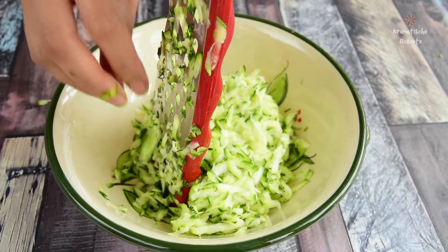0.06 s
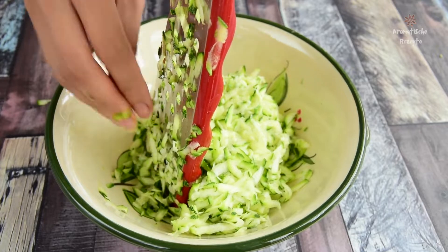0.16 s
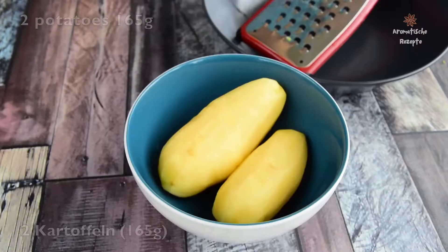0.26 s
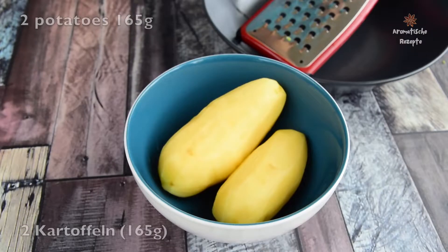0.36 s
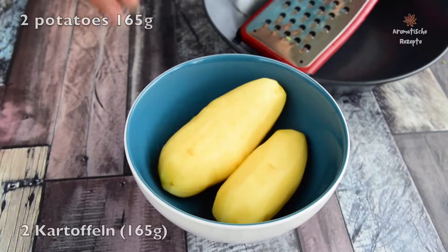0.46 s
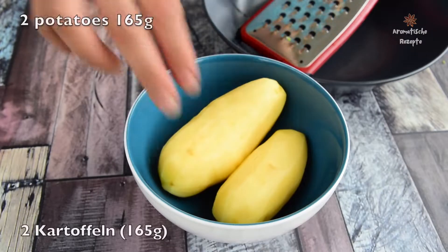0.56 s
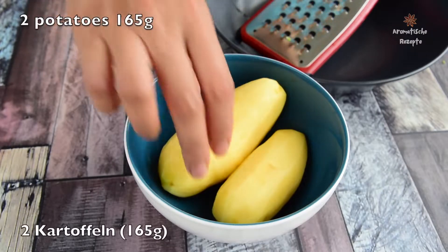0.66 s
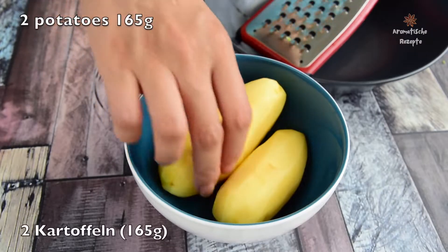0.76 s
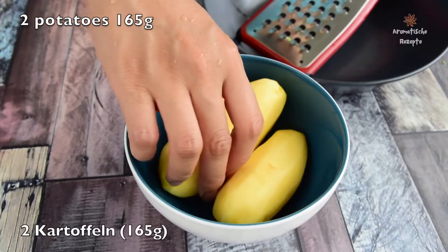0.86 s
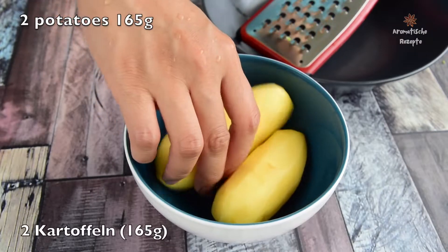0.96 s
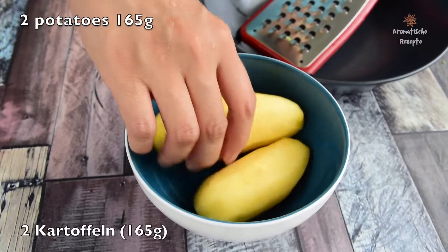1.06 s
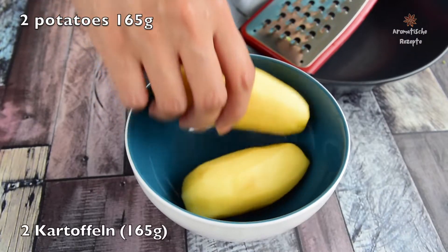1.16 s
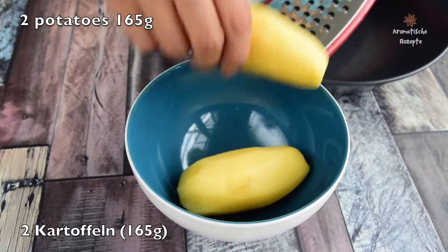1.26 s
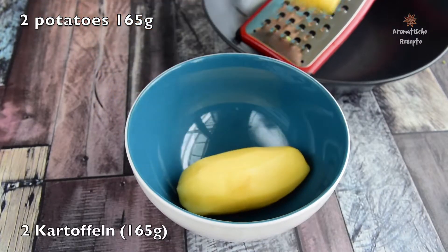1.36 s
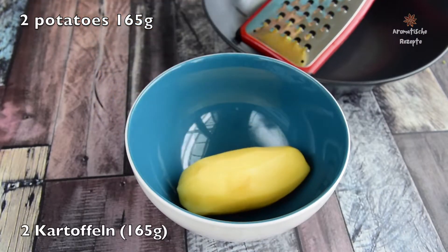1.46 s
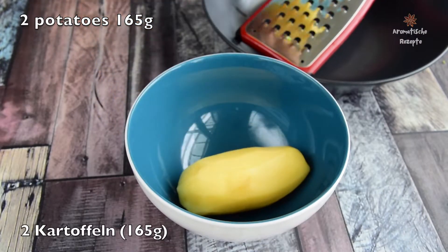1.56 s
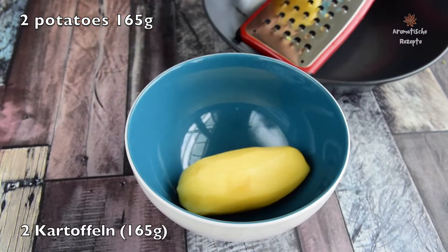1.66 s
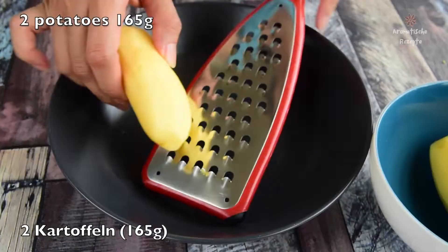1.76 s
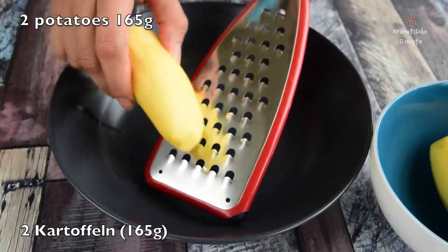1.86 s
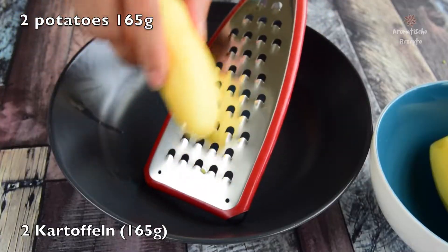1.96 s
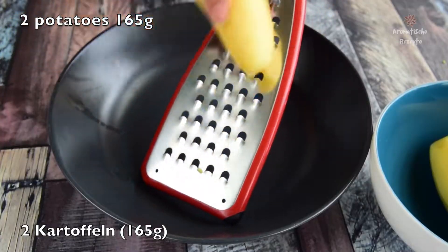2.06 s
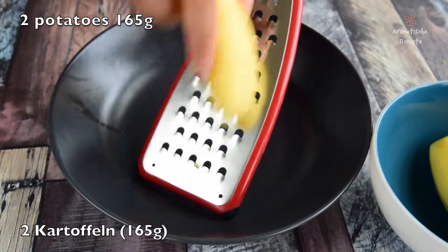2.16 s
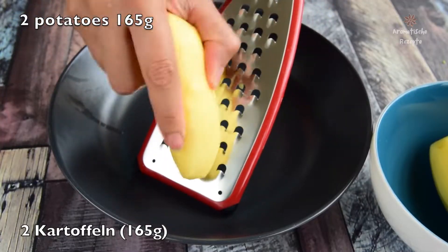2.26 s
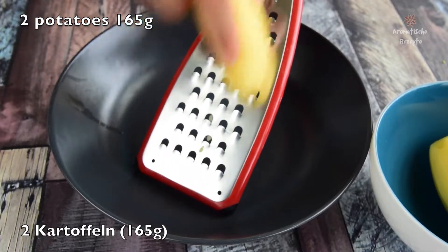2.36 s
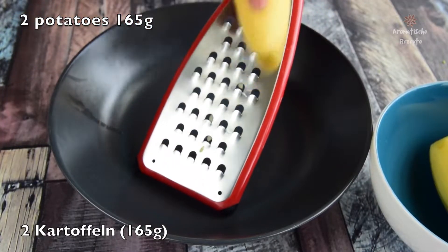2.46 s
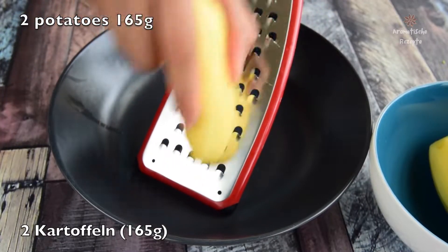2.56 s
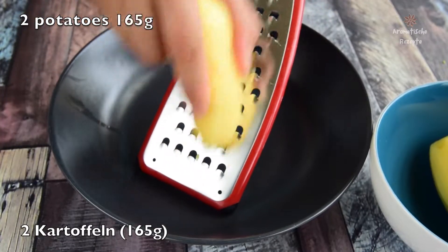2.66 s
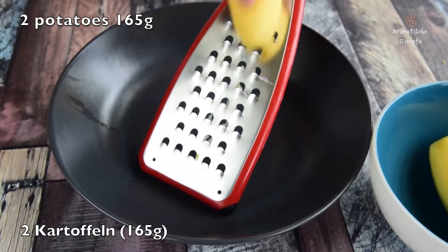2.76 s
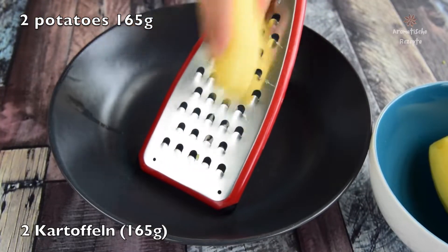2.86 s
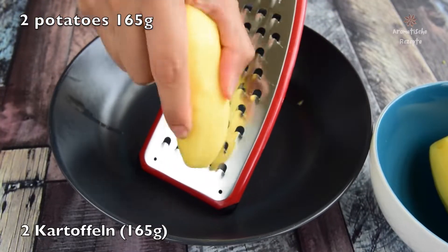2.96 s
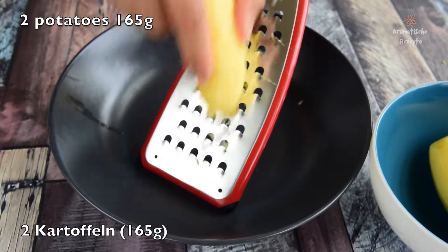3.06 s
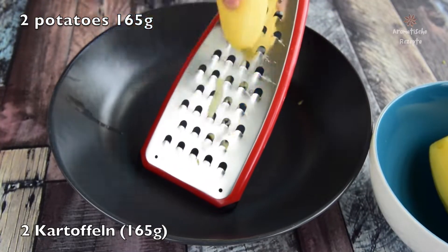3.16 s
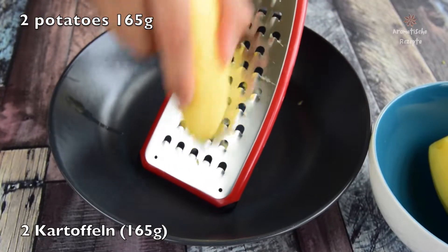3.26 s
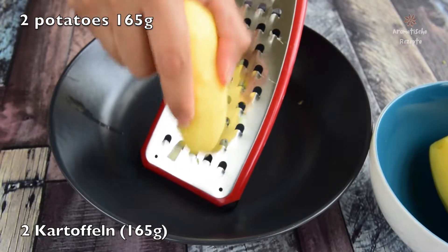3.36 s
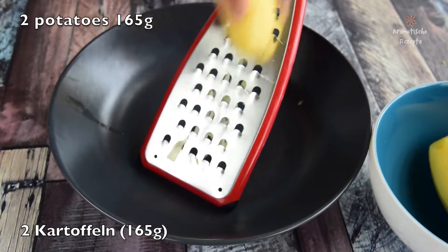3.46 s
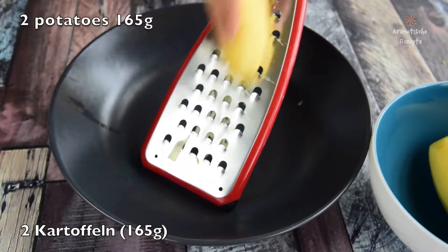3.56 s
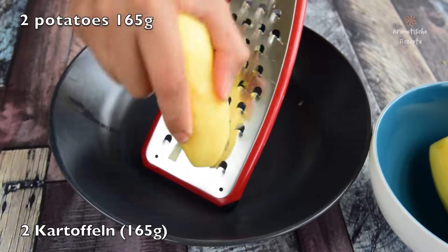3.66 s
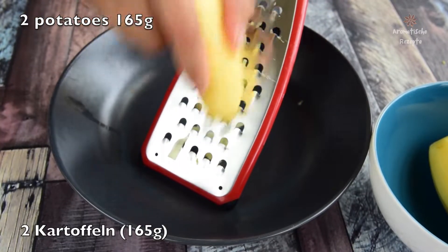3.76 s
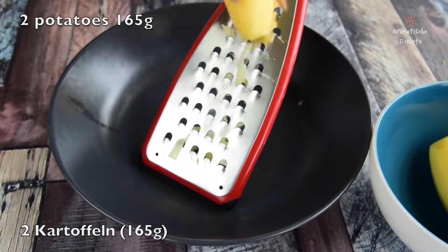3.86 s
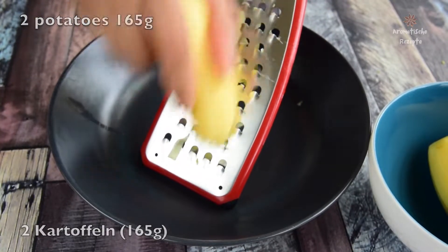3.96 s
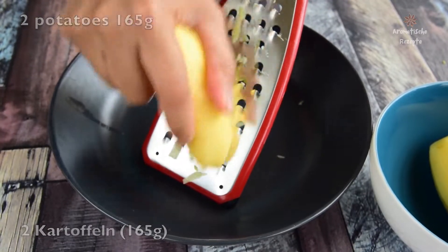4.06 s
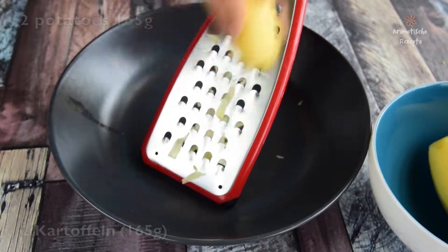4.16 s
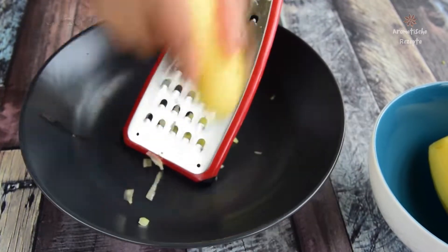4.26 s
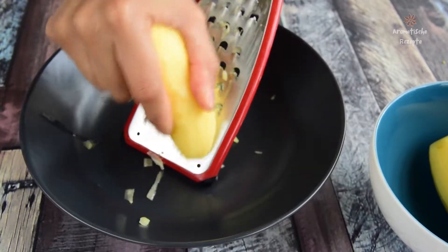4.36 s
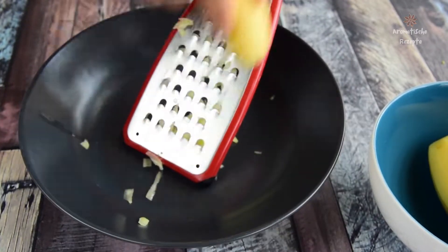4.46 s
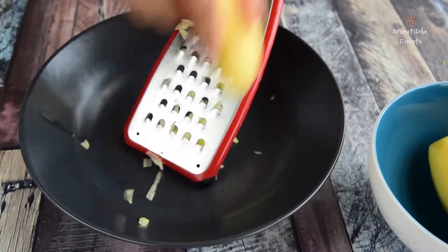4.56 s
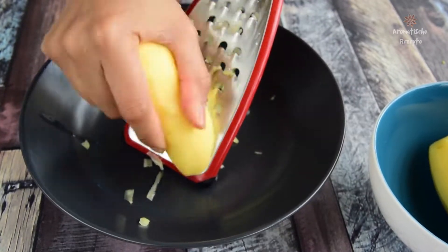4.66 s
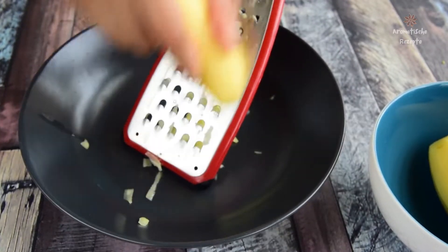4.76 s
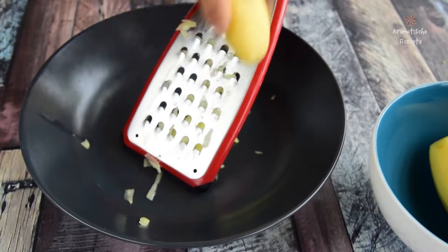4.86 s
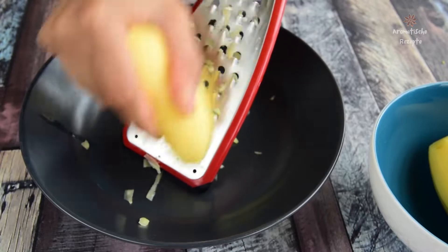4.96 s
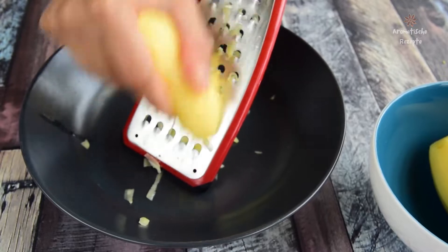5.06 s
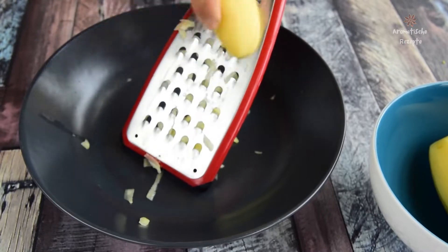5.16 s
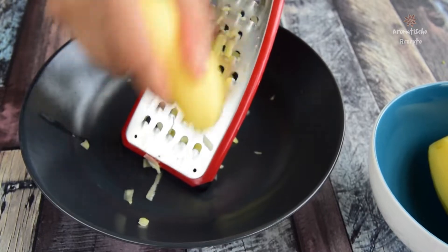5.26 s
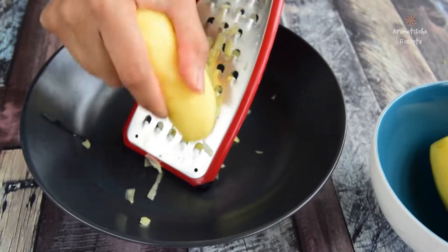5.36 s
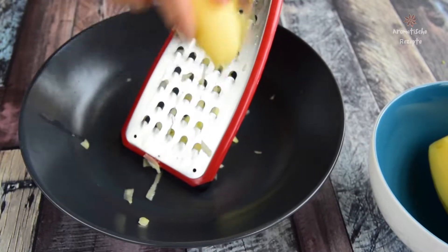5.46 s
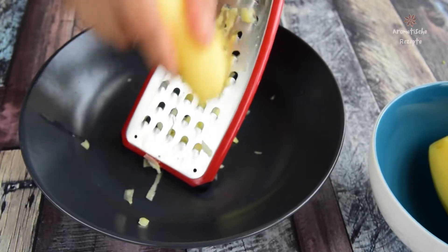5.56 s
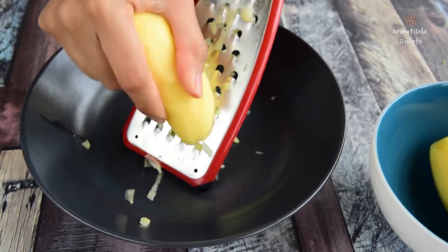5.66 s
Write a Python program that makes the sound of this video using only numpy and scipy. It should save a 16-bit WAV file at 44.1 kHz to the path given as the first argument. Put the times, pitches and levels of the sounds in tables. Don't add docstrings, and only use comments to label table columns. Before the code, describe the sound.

Soft room hiss fades in, then a single thuddy bowl knock, slight hand rumble and a short ceramic clink. The view changes and rhythmic grating begins: harsh, juicy rasps on a thin ringing plate alternating with quieter skipping return scrapes. Occasional catches ping and thump. The close microphone picks up a small dry room and a little hiss.

```python
import sys
import numpy as np
from scipy import signal
from scipy.fft import rfft, irfft, next_fast_len
from scipy.io import wavfile
from scipy.ndimage import uniform_filter1d

SR = 44100
rng = np.random.default_rng(int(sys.argv[2]) if len(sys.argv) > 2 else 0)


def wrap_up_sound(samples):
    columns = np.atleast_2d(samples).T
    tamed = np.clip(columns, -1, 1)
    steps = np.round(tamed * 32767).astype(np.int16)
    wavfile.write(sys.argv[1], SR, steps)


def invert_db(level):
    return 10 ** (np.asarray(level, dtype=float) / 20)


N = 251811
TIME = np.arange(N) / SR
CUTTING, RETURNING = 0, 1
LINGER_S = 0.0074

# start_s, peak_db, treble_minus_peak_db, table_thump_db, pinged_mode_hz
CATCH = [(1.991, -26, -10, -45, 4070), (2.015, -27.5, -13.5, -45, 3300), (2.064, -29.5, -18, -55, 5050),
         (2.317, -26, -5, -32, 2530), (2.346, -31, 5, -35, 2550), (2.399, -22.5, 5, -42, 5600),
         (2.66, -34.5, 1, -39, 4300), (2.712, -27, 2, -33, 770), (2.746, -23, 4.5, -32.5, 4350),
         (2.822, -26.5, 6.5, -50, 4720), (2.858, -29, -1.5, -44, 4670), (3.033, -32.5, 0, -49, 3440),
         (3.07, -25, 1, -41, 3240), (3.105, -18, -5, -38.5, 3366), (3.418, -22.5, -4.5, -35.5, 5000),
         (3.462, -20, 1, -43, 3690), (3.557, -31.5, -5, -50, 4740), (3.729, -16.5, -33, -35, 3240),
         (3.829, -14.5, -6, -52, 3480), (3.885, -26.5, 2, -45, 4300), (4.224, -30.5, 1.5, -41, 4000),
         (4.376, -24, -3.5, -50, 1603), (5.102, -33, 9, -64, 3840), (5.581, -19.5, -1.5, -33.5, 5370)]
# start_s, level_db
BOWL_TAP = [
    (.9655, -22.5),
]


def level(x, db):
    return x * invert_db(db) / np.sqrt(np.mean(x ** 2))


def colour(x, points):
    curve_hz, curve_db = np.transpose(points)
    hz = np.fft.rfftfreq(4096, 1 / SR) + 1
    db = np.interp(np.log(hz), np.log(curve_hz), curve_db)
    cepstrum = irfft(np.log(invert_db(db)))
    cepstrum[1:2048] *= 2
    cepstrum[2049:] = 0
    response = irfft(np.exp(rfft(cepstrum)))
    return level(signal.oaconvolve(x, response)[:N], 0)


def walk(rate):
    hold = int(SR / rate)
    steps = np.repeat(rng.standard_normal(4000), hold)[:N]
    return 1.2 * uniform_filter1d(steps, hold)


def linger(power, seconds):
    k = np.exp(-1 / (seconds * SR))
    return np.sqrt(signal.lfilter([1 - k], [1, -k], power) + 1e-18)


def strike(taps, modes, push=.0004):
    out, t = np.zeros(N + SR), TIME[:SR // 2]
    ring = sum(invert_db(db - 60 * t / t60) * np.sin(2 * np.pi * hz * t) for hz, db, t60 in modes)
    ring = ring * (1 - np.exp(-t / push))
    for s, db in taps:
        start = int(s * SR)
        out[start:start + len(t)] += invert_db(db) * ring
    return out[:N]


def bursts(start_s, db, rise, fall):
    t = np.maximum(TIME[None, ::16] - start_s[:, None], 0)
    puffs = np.exp(-t / fall) * (1 - np.exp(-t / rise))
    return np.repeat(invert_db(db) @ puffs, 16)[:N]


def strokes(way, db, column=2, more_power=0, fall_db=0):
    # start_s, length_s, level_db, share_before_top_speed (0-1), table_shake_db
    down = [(2.059, 0.18, -29.5, 0.81, -41), (2.44, 0.16, -25.5, 0.42, -36.5),
            (2.785, 0.18, -26, 0.48, -33.5), (3.156, 0.16, -25, 0.42, -34.5),
            (3.499, 0.17, -23.5, 0.4, -32.5), (3.859, 0.16, -21.5, 0.43, -30),
            (4.202, 0.13, -21.5, 0.34, -33.5), (4.496, 0.16, -22, 0.52, -33.5),
            (4.839, 0.15, -22, 0.56, -33.5), (5.165, 0.12, -23, 0.7, -31.5), (5.491, 0.14, -24, 0.47, -31)]
    up = [(1.958, 0.11, -45.5, 0.48, -45), (2.235, 0.251, -40.5, 0.4, -35.5),
          (2.575, 0.22, -37.5, 0.5, -33.2), (2.945, 0.21, -34.5, 0.69, -38.5),
          (3.303, 0.18, -31.5, 0.84, -38), (3.647, 0.199, -32.5, 0.78, -34), (3.997, 0.2, -30.5, 0.75, -37),
          (4.304, 0.17, -32.5, 1, -43), (4.648, 0.086, -34.5, 0.71, -40), (4.989, 0.14, -39.5, 0.23, -40),
          (5.282, 0.18, -34.5, 1, -36), (5.673, 0.19, -14.5, 0.84, -60.0)]
    landing = (1.912, .08, -46.5, .65, -50)
    rows = np.array((down, [landing, *up])[way])
    along = np.clip((TIME[::16] - rows[:, :1]) / rows[:, 1:2], 0, 1)
    top = np.clip(rows[:, 3:4], .05, .95)
    speed = np.sin(np.pi / 2 * np.minimum(along / top, (1 - along) / (1 - top)))
    speed_power = (1.057, 1.5)[way]
    gain = invert_db(rows[:, column, None] + db - fall_db * along) * speed ** (speed_power + more_power)
    return np.repeat(np.sum(gain ** 2, axis=0), 16)[:N]


def tears(rate, spread_db, patchy_db):
    size = invert_db(spread_db * rng.exponential(size=N)) * rng.standard_normal(N)
    torn = rng.random(N) < rate / SR
    contact_db = patchy_db * walk(170) + patchy_db / 2 * walk(60)
    return level(size * torn * invert_db(contact_db), 0)


def tooth_rows():
    gap_s, tick_db, spread_db, fall_s = .021, 2.5, 2.5, .0035
    chance, ticks = rng.standard_normal((400, 2)), np.zeros(4 * N)
    at = np.cumsum(gap_s * invert_db(3 * chance[:, 0])) * SR
    ticks[at.astype(int)] = invert_db(tick_db + spread_db * chance[:, 1])
    t = TIME[:1024]
    shape = np.exp(-t / fall_s) * (1 - np.exp(-t / .001))
    skip_db = 2 * walk(45)
    return invert_db(skip_db) * (1 + signal.oaconvolve(ticks[:N], shape)[:N])


def patchy(x):
    size = next_fast_len(N, real=True)
    spectrum, hz = rfft(x, size), np.fft.rfftfreq(size, 1 / SR)
    step = np.clip(2 * np.log2(hz / 1000 + 1e-9), 0, 8)
    out = 0
    for k in range(9):
        band = irfft(spectrum * np.clip(1 - np.abs(step - k), 0, 1), size)[:N]
        out = out + band * invert_db(2.6 * walk(55))
    return out


def ring_by_turns(x, modes, wander_db):
    out = 0
    for hz, width, db in modes:
        pole = np.exp((2j * hz - width) * np.pi / SR)
        drive = x * invert_db(wander_db * walk(35))
        out = out + invert_db(db) * np.sqrt(width) * signal.lfilter([1], [1, -pole], drive).imag
    return signal.sosfilt(signal.butter(2, 1100, "high", fs=SR, output="sos"), out)


def flesh(cutting, contact, scrape, hiss):
    # pitch_hz, level_db per Hz
    cut = [(240, -56), (400, -29.5), (751, -17), (2020, -10), (2590, 0), (3010, -5), (3340, -1), (3940, -1),
           (4270, 0.5), (6500, -3.5), (8450, -13.5), (14300, -120)]
    slide = [(530, -35), (900, -23.5), (1470, 0.5), (2820, -2.5), (3190, -0.5), (4550, 8), (4790, 12),
             (5200, 2.5), (6500, -4), (8450, -54), (14300, -120)]
    wet_hiss = [(3530, -45), (6000, -6), (7010, -8), (8100, 1), (8790, -3.5), (12200, -1.5), (13900, -7.5),
                (16000, -17)]
    rough = contact + 1.1 * tears(16000, 1.2, 1.3)
    fine = contact + 1.4 * tears(18000, 1.1, 1.5)
    low = scrape * (cutting * colour(rough, cut) + (1 - cutting) * colour(rough, slide))
    return patchy(low + hiss * colour(fine, wet_hiss))


def steel(cutting, contact, scrape, hiss):
    # pitch_hz, width_hz, level_db
    plate = [(1480, 90, -7), (1615, 70, -9), (2070, 55, -6), (2390, 80, -8), (2515, 70, -6), (2670, 80, -6),
             (3110, 70, -2), (3260, 80, -2), (3350, 70, -3), (3460, 90, -1), (3735, 80, -3), (4110, 90, -6),
             (4270, 110, -1), (4720, 110, -3), (4880, 90, -1), (5330, 80, -5), (5800, 110, -7),
             (6200, 140, -8)]
    # pitch_hz, width_hz, level_db
    teeth = [(8600, 220, -12), (10830, 350, 7), (10180, 200, 21.5), (11680, 300, 6)]
    drive = contact * scrape * invert_db(-3 * cutting)
    plate_ring = level(ring_by_turns(drive, plate, wander_db=4.5), -35)
    return plate_ring + level(ring_by_turns(contact * hiss, teeth, wander_db=4), -39.5)


def catches():
    ping = sum(strike([(s, db - 5.5)], [(hz, 0, .05)], push=.002) for s, db, _, _, hz in CATCH)
    taps = [(s, thump_db - 1.5) for s, _, _, thump_db, _ in CATCH]
    return ping + strike(taps, [(130.7, 7.2, 0.11), (173.0, 0.5, 0.22)], push=0.0017)


def grater():
    down = linger(strokes(CUTTING, -3), LINGER_S)
    up = linger(strokes(RETURNING, -1.5), LINGER_S)
    cutting = down / (down + up)
    tearing = strokes(CUTTING, 4, more_power=0.33, fall_db=2.5)
    tearing = tearing + strokes(RETURNING, 0.66, more_power=.2, fall_db=-1)
    skip = cutting + (1 - cutting) * invert_db(-2.0) * tooth_rows()
    start_s, peak_db, treble_db = np.array(CATCH).T[:3]
    scrape = skip * np.hypot(down, up) + bursts(start_s, peak_db + 4, 0.0048, 0.0025)
    hiss = skip * linger(tearing, LINGER_S) + bursts(start_s, peak_db + treble_db - 1.5, 0.00055, 0.0024)
    contact = cutting * tears(16000, 1.1, 1.1) + (1 - cutting) * tears(6000, 1.5, 2.2)
    grating = flesh(cutting, contact, scrape, hiss) + steel(cutting, contact, scrape, hiss)
    return grating + catches()


def bowl():
    # pitch_hz, level_db, t60_s
    bowl_modes = [(134, -2.5, 0.09), (192, -13, 0.12), (63.1, -13.5, 0.75), (101.3, -22, 0.61),
                  (271, -13.5, 0.064), (1140, -22, 0.075), (1268, -41.5, 0.091), (1650, -15, 0.06),
                  (654, -32, 0.046)]
    return strike(BOWL_TAP, bowl_modes, push=0.0037)


def dish():
    # start_s, level_db
    tap = [
        (1.3705, -23.5),
    ]
    # pitch_hz, level_db, t60_s
    dish_modes = [(160, -15, .08), (400, -28, .06), (770, 0, .06), (803, -25, .45), (900, -3, .12),
                  (895, -30, .45), (1174, -24, .2), (1299, -6, .17), (1345, -23, .3), (1620, -3, .055),
                  (2055, 3, .055), (2046, -33, .55), (2200, -8, .06), (2418, -4, .12), (2395, -30, .5),
                  (2780, -22, .2), (2840, 1, .085), (3800, -10, .07), (3817, -31, .6), (3934, -22, .1),
                  (4958, -38, .35), (5100, -26, .04), (6300, -28, .08)]
    # pitch_hz, half_split_hz, level_db, t60_s
    split_rim = (2845, 7.6, -15, .45)
    hz, half_split, db, t60 = split_rim
    since = np.maximum(TIME - tap[0][0], 0)
    out = strike(tap, [(hz, db, t60)]) * np.sin(2 * np.pi * half_split * since)
    for mode in dish_modes:
        flutter_db = 5 * np.minimum(since / .06, 1) * (walk(50) - .9)
        out = out + strike(tap, [mode], push=.0003) * invert_db(flutter_db)
    return out


def chinks():
    # start_s, pitch_hz, level_db, t60_s
    glaze = [(.805, 2900, -61, .3), (1.105, 11300, -58, .25), (1.105, 8000, -61, .2),
             (1.105, 5300, -62, .12), (1.1, 2050, -58, .1), (1.06, 11300, -62, .2), (1.14, 1106, -65, .9),
             (1.232, 1106, -62, .6), (1.195, 2906, -66, .5), (1.515, 2050, -54, .15)]
    return sum(strike([(s, db)], [(hz, 0, t60)], push=.003) for s, hz, db, t60 in glaze)


def grip(db, t60):
    rise_s, hold_s = .04, .11
    since = TIME - BOWL_TAP[0][0]
    settle_db = -60 * np.maximum(since - hold_s, 0) / t60
    return np.clip(since / rise_s, 0, 1) ** 2 * invert_db(db + settle_db)


def table():
    # pitch_hz, level_db per Hz
    rumble_curve = [(13, -41.5), (22, 9), (48, -6), (65, 8.5), (92, 2.5), (125, -0.5), (183, -3.5),
                    (227, -22), (285, -14.5), (330, -26), (430, -57.5), (730, -120)]
    creak_curve = [(200, -29.5), (270, 4), (350, -3), (480, -1.5), (600, -20.5)]
    rumble = colour(rng.standard_normal(N) * invert_db(2.9 * walk(30)), rumble_curve)
    creak = colour(tears(1500, 0.99, 4.3), creak_curve)
    boom = colour(tears(2500, 1.3, 1.6), [(420, -65), (560, 5.5), (740, 11.5), (900, -6), (1100, -34.5)])
    rub_curve = [(700, -47.5), (1000, -22), (1200, -18.5), (1500, -25.5), (2000, -41.5)]
    rub = colour(tears(5400, 1.5, 2.5), rub_curve)
    shaking = strokes(CUTTING, 0, column=4, more_power=0.11)
    shaking = shaking + strokes(RETURNING, 0, column=4, more_power=0.71)
    shake = linger(shaking, 0.045)
    catch = np.array(CATCH)
    push = linger(strokes(CUTTING, -27.5) + strokes(RETURNING, -16), LINGER_S)
    push = push + bursts(catch[:, 0], catch[:, 3] - 8.5, 0.0016, 0.016)
    shaken = shake * (rumble + invert_db(-17) * creak) + push * boom
    return shaken + grip(-44, 0.48) * rumble + grip(-61.5, .45) * rub


def room(dry):
    t60_s, tail_db = .45, -20.5
    t = TIME[:SR // 2]
    tail = signal.lfilter([.3], [1, -.7], rng.standard_normal(len(t)))
    tail = tail * invert_db(-60 * t / t60_s) * (t > .004)
    return signal.oaconvolve(dry, level(tail, tail_db) / np.sqrt(len(t)))[:N]


def kitchen():
    # pitch_hz, level_db per Hz
    floor = [(12, -40), (42, 2), (65, 2.5), (81, -3), (98, -5), (182, -8), (678, -14.5), (759, -14.5),
             (1220, -17.5), (2820, -20.5), (3160, -21.5), (13500, -23.5), (16000, -23)]
    return level(colour(rng.standard_normal(N), floor), -55.5)


def widen(mono):
    # pitch_hz, relative_gain_db
    side_gain = [(60, -19), (110, -17.5), (200, -17.5), (380, 5.5), (700, -12), (1290, -12.5),
                 (2380, -14.5), (4400, -7), (8120, -3.5), (15000, -1.5)]
    smear = rng.standard_normal(512) * invert_db(-60 * TIME[:512] / .02)
    side = level(colour(signal.oaconvolve(mono, smear)[:N], side_gain), -52)
    return np.array([mono + side, mono - side])


def scene():
    dry = grater() + bowl() + dish() + chinks()
    return widen(dry + room(dry) + table() + kitchen())


def shots():
    # start_s, fade_in_s, fade_depth_db, gain_db
    views = [
        (-1, .5, 50, 6),
        (.208, 0.55, 60.5, 7.5),
        (1.768, 0.34, 39, -2),
    ]
    ends = [view[0] for view in views[1:]] + [N / SR]
    gain = 0
    for (start, fade, depth_db, db), end in zip(views, ends):
        missing = np.clip(1 - (TIME - start) / fade, 0, 1) ** 1.44
        drop_db = 60 * np.maximum(TIME - end, 0) / .027
        gain = gain + (TIME >= start) * invert_db(db - depth_db * missing - drop_db)
    return gain


def low_pass(x):
    return signal.sosfilt(signal.butter(12, 16680, fs=SR, output="sos"), x)


def record(dry):
    x = np.tanh(2.0 * dry) / 2.0
    x = signal.sosfilt(signal.butter(2, 38, "high", fs=SR, output="sos"), x)
    x = x * shots() + invert_db(-91) * rng.standard_normal(N)
    mix = signal.sosfilt(signal.ellip(8, .3, 70, 15900, fs=SR, output="sos"), x)
    return low_pass(mix)


dry = scene()
out = record(dry)
wrap_up_sound(out)
```